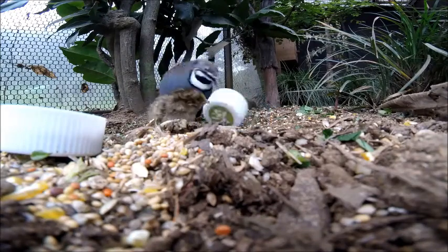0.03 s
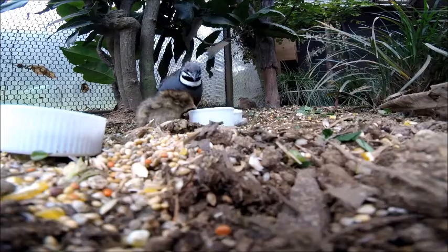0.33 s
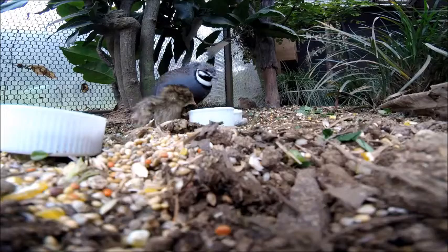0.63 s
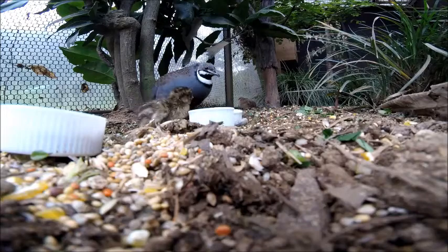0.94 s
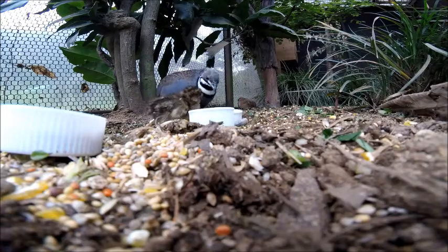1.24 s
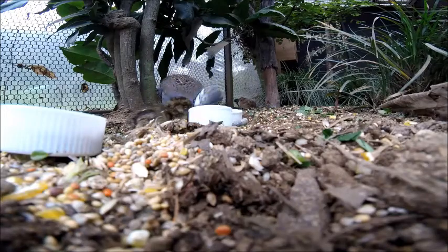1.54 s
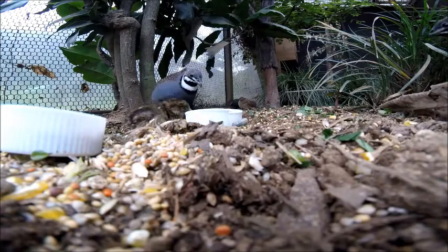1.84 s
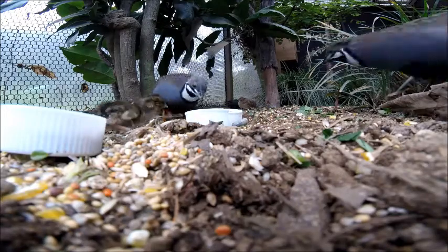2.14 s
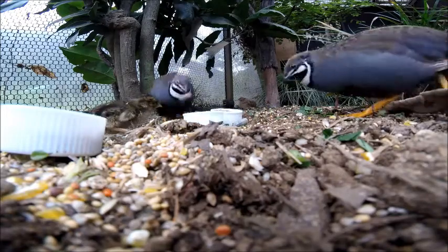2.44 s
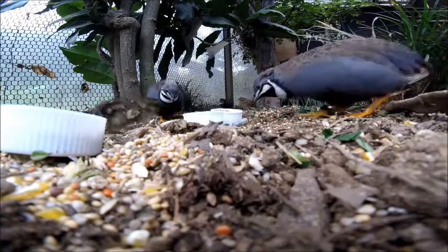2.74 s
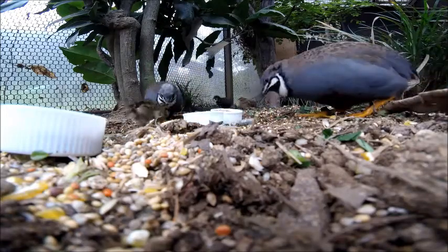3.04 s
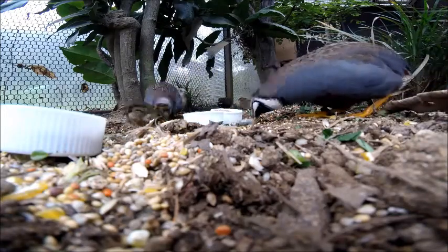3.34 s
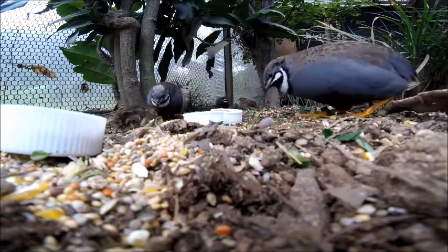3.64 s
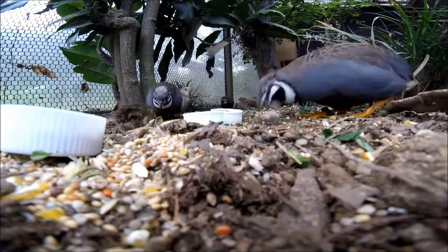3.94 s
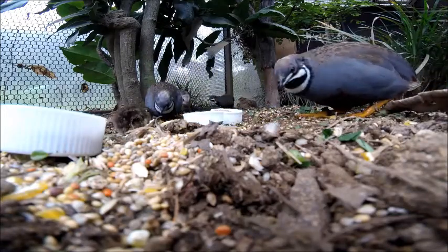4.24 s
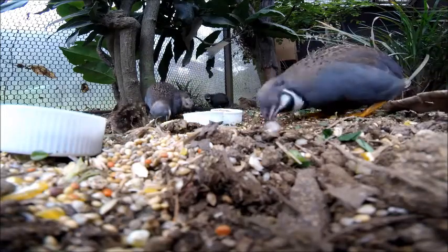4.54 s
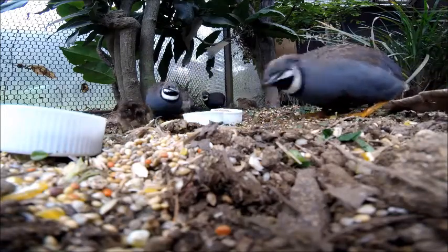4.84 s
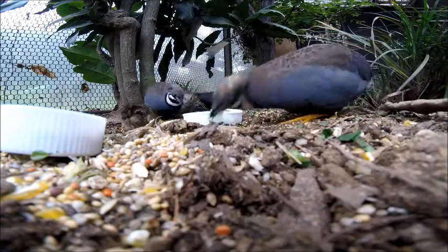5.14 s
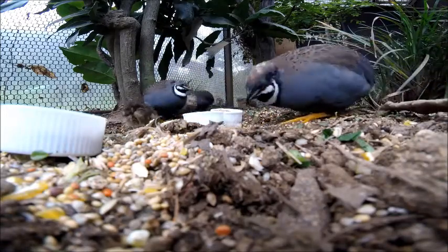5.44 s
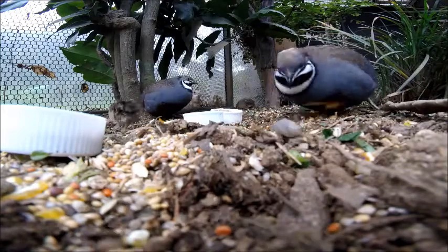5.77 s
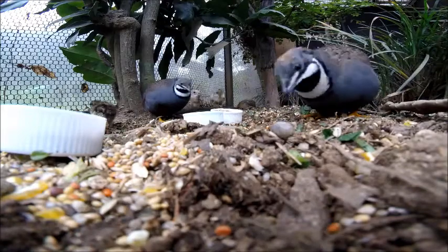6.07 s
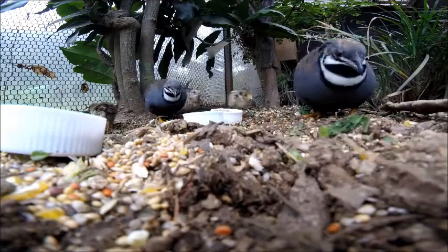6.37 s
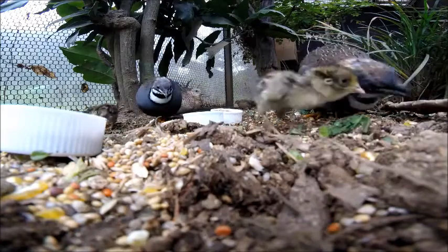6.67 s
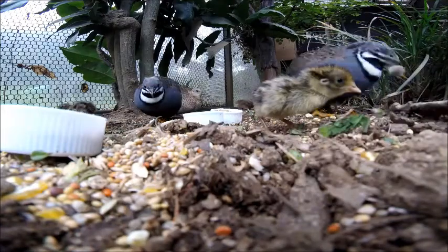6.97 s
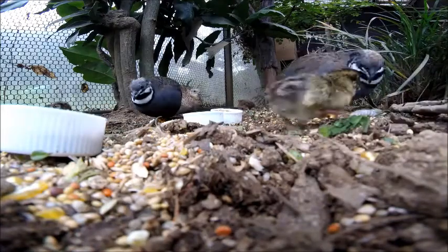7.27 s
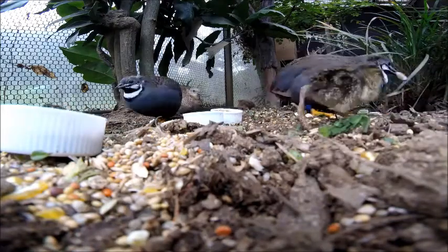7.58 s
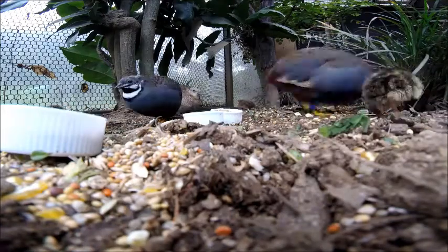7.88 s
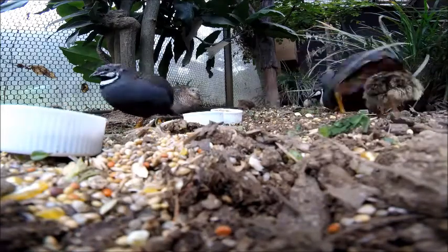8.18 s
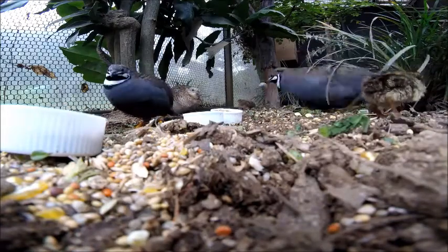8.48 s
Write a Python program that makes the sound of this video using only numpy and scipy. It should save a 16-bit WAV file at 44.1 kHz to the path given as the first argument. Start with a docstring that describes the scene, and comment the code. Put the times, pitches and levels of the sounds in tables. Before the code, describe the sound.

Small quail call irregularly, close by in an outdoor aviary. A few light pecks on seed open, then high peeps and a slightly rising nasal cry. After a quieter stretch come soft clucks, a hoarse cry and sharper pecks. Chicks whistle thinly throughout, louder in the second half, and a sharp falling squeal and a high rasp come near the end. A faint low rumble, machine hum and hiss lie underneath.

```python
"""Nasal cries, soft clucks and high peeps of small quail, close by at a food dish in an outdoor aviary.
Each call is one syrinx tone, clear or rasping, smeared by the nearby walls.
Chicks and other small birds whistle and chip around them, while beaks and feet tick on seed and bark.
Underneath lies a bed of low rumble, machine hum and steady hiss."""
import sys
import numpy as np
from scipy import signal
from scipy.fft import rfft, irfft, next_fast_len
from scipy.io import wavfile
from scipy.ndimage import uniform_filter1d, map_coordinates

SR = 44100
rng = np.random.default_rng(int(sys.argv[2]) if len(sys.argv) > 2 else 0)


def dump_mix(stems):
    """Bounce the given channels to the path in sys.argv[1] as a 16-bit WAV at rate SR."""
    frames = np.atleast_2d(stems).T  # one column per channel
    limited = np.clip(frames, -1, 1)  # hard clip at full scale
    pcm = np.round(limited * 32767).astype(np.int16)
    wavfile.write(sys.argv[1], SR, pcm)


N = 384111

# Short quail notes: nasal cries, shut-beak clucks and high peeps. Each row: crest time, attack and
# release in seconds, pitch in Hz, glide in octaves per second, crest level in dB,
# roughness (0 is clear, about 1 is a rasp), overtone boost in dB.
SHORT_CRIES = [ (3.81, .02, 0.037, 805, .2, -42, 0.35, 0), (3.932, 0.03, 0.025, 856, -0.069, -45.5, .4, -4),
               (8.53, .14, 0.084, 766, -0.033, -48, 0.97, -1), ]
CLUCKS = [ (.51, .012, .05, 972, 2, -57, .1, -10), (1.165, 0.016, 0.022, 1533, -8.5, -45, 1.1, 4),
          (1.67, 0.0083, .035, 958, 2, -51.5, .15, -13), (1.718, .035, .012, 1170, 7, -59, .02, 13),
          (1.745, 0.016, 0.0063, 1133, -11, -48.5, 0, -4), (5.346, 0.014, 0.023, 1125, 16, -41.5, 0.6, -7),
          (5.405, .012, 0.031, 1160, -16, -40, 0.54, -8.5), (5.458, 0.042, 0.02, 893, -1.5, -42.5, .25, -7),
          (6.635, 0.014, .08, 690, 1.1, -51.5, 0.06, -.5), (6.755, 0.089, .06, 681, 0, -49.5, 0.25, -6), ]
PEEPS = [ (.152, 0.015, 0.032, 2392, 0, -47, 0.4, -23), (.185, 0.036, 0.045, 3345, -4, -46, 0.8, -22),
         (.235, 0.042, 0.0067, 2433, -2, -38, 0.19, -28), (.828, 0.01, .018, 2420, -1, -44, .08, -16),
         (1.015, 0.0073, 0.031, 4130, -0.5, -45, 0.24, -15), (1.065, 0.029, 0.028, 4720, 4, -40, 0.34, -24),
         (1.13, 0.066, 0.035, 3610, 2.5, -36, 0.4, -7.5), (1.152, .006, .012, 5000, -3, -37.5, 0.43, -13),
         (1.17, 0.01, 0.016, 4810, -1, -36, 0.3, -21), (1.195, 0.0236, 0.037, 4000, -2.5, -46, .6, -9),
         (1.205, 0.021, 0.043, 3240, -3, -40, 0.3, -4.5), (2.362, .03, 0.056, 2080, 6.5, -49.5, 0.63, -10),
         (3.643, 0.024, 0.03, 1605, 1, -48, 0.23, -5), (3.715, 0.076, 0.041, 1990, 0.6, -49, 0.76, -5.5),
         (3.893, .006, 0.022, 2250, -1, -54, 0.4, -20), (3.925, 0.024, 0.097, 2860, -3.5, -50.5, 1, -18),
         (3.998, 0.034, .012, 2725, 0.5, -44, 0.2, -20), (4.017, 0.071, .04, 3570, 1.5, -55, 0.63, -25),
         (4.028, 0.011, .018, 2780, -1, -42.5, 0.6, -20), (4.325, .045, .03, 2250, 0, -57.5, 0.82, -15),
         (4.445, 0.061, 0.043, 2524, 1.5, -46, 0.33, -15),
         (4.735, 0.037, .025, 2360, -0.7, -50.5, 0.57, -3), (4.805, 0.036, 0.029, 2398, 0.7, -52, 0.54, 1),
         (5.513, 0.014, 0.038, 2413, 1.8, -39.5, 0.06, -10),
         (5.914, .006, 0.018, 4165, 1.5, -36.5, 0.08, -31),
         (5.938, 0.013, 0.0078, 4205, -1.5, -35.5, .04, -34),
         (5.975, 0.021, 0.012, 3530, 0, -32.5, 0.13, -13), (6.01, 0.018, 0.063, 3130, 4.5, -41.5, 0.23, -9),
         (6.035, 0.017, 0.054, 4800, -3, -44, .4, -10), (8.086, 0.023, .005, 5520, -3.5, -38.5, 0.1, -14),
         (8.097, 0.0067, 0.015, 2177, -1.5, -32, 0.7, 8.5), (8.6, .045, 0.025, 4540, -0.5, -45, 0.54, -11),
         (8.67, .014, 0.056, 3100, 2.5, -39.5, 0.3, -16), ]
NOTE_FADE_DB, NOTE_FADE_POWER, NOTE_END_ROUGH = 12.5, 1.44, 0.12
# Drawn quail calls, one to a table: three long nasal cries, a high rasp and a plunging squeal.
# Each row: time in seconds, pitch in Hz, level in dB, roughness.
RISING_CRY = [(.82, 825, -51, 0.44), (.845, 892, -37.5, 1.11), (.868, 868, -35.5, 0.11),
              (.903, 858, -38, 0.06), (.916, 902, -34, 0.24), (.945, 896, -38, 0.24), (1.01, 949, -36, 0.4),
              (1.06, 931, -36, 0.53), (1.11, 943, -38, 0.7), (1.135, 982, -55, 0.9)]
HOARSE_CRY = [(5.528, 908, -45, 0.65), (5.56, 940, -37.5, 0.045), (5.587, 906, -37, 0.063),
              (5.61, 888, -35.5, 0.11), (5.625, 836, -40.5, 0.26), (5.645, 895, -41, 1.23),
              (5.68, 893, -38, .45), (5.725, 892, -39.5, 0.68), (5.78, 913, -34, 0.25),
              (5.82, 862, -39, 0.16), (5.852, 842, -37.5, 0.081), (5.868, 832, -56, 0.44)]
LOW_CRY = [(6.42, 672, -52, 0.28), (6.48, 709, -47, 0.23), (6.5, 730, -41.5, 0.13),
           (6.56, 713, -42.5, 0.25), (6.595, 672, -45, 0.47), (6.625, 660, -51, .4)]
RASP = [(8.32, 2330, -53, 0.68), (8.358, 2140, -47, 0.75), (8.395, 2053, -35, 0.27),
        (8.43, 2020, -48.5, .6), (8.485, 2138, -38, 0.34), (8.51, 2133, -43.5, 0.49),
        (8.6, 2140, -46.5, 0.67), (8.635, 2030, -58, 0.85)]
SQUEAL = [(8.005, 5860, -46, .05), (8.018, 5860, -44, .1), (8.03, 4900, -32.5, 0.32),
          (8.04, 3930, -35, .62), (8.05, 3695, -25.5, .02), (8.055, 3690, -23.5, .05),
          (8.06, 3900, -57, .41)]
# The timbre of each voice. Each row: harmonic number, relative level in dB.
CRY_HARMONICS = [(1, -6.5), (2, -11), (3, -5.5), (4, 1), (5, -13), (6, -23.5), (7, -20), (8, -20), (9, -36),
                 (10, -37), (12, -40)]
CLUCK_HARMONICS = [(1, -4.5), (2, -3), (3, -13), (4, -21)]
PEEP_HARMONICS = [(1, 8.5), (2, 3), (3, -11.5), (4, -13.5)]
# Throat and beak favour harmonics as they glide past. Each row: frequency in Hz, gain in dB.
THROAT_EQ = [(1000, 2), (1800, -0.5), (2550, -3.5), (2850, 6), (3200, -2.5), (3600, 1.5), (4200, 0.5),
             (5500, -1), (6500, 6), (8000, -3)]

# Thin arched whistles. Each row: start and length in seconds, top pitch, rise and fall in Hz,
# level in dB.
THIN_WHISTLES = [ (.045, .067, 3400, 68, 190, -54.5), (0.206, .05, 2500, 0, 1100, -60),
                 (0.383, .055, 3450, 450, -1, -66), (1.3, .05, 3340, 190, 130, -60),
                 (1.44, .06, 3310, 110, 190, -61.5), (1.525, 0.27, 3680, 161, 112, -65),
                 (1.872, 0.066, 3500, 182, 310, -59.5), (1.945, 0.057, 2570, 0, 210, -63),
                 (2.003, 0.049, 3500, 230, 80, -59.5), (2.2, 0.3, 3600, 220, 67, -66.5),
                 (2.79, 0.24, 3790, 360, 120, -66.5), (2.88, .085, 3450, 148, 130, -70),
                 (3.035, 0.074, 3480, 188, 280, -61.5), (3.15, .06, 2540, 40, 130, -65),
                 (3.165, 0.077, 3700, 0, 370, -68), (3.47, 0.12, 3390, 394, 20, -69),
                 (3.77, .03, 3480, -6, 480, -64), (4.04, 0.1, 3540, -1, 300, -69),
                 (4.52, 0.12, 3550, 844, 5, -67), (4.84, 0.051, 3430, 0, 780, -63),
                 (6.35, .048, 3150, 0, 820, -62), (6.835, 0.04, 3530, -2, 900, -61),
                 (7.051, .045, 2480, 6, 600, -67), (7.11, 0.1, 3100, 120, 130, -68), ]
# Long whistles that sag on the climb. Each row: start and length in seconds, top pitch, rise and fall
# in Hz, sag delay in seconds, sag depth in Hz, crest level in dB.
LONG_WHISTLES = [ (4.89, 0.25, 3700, 348, 240, 0.12, 228, -65),
                 (5.225, 0.31, 3670, 1020, 480, 0.11, 210, -59.5),
                 (5.95, 0.3, 3625, 1020, 600, 0.15, 128, -52.5),
                 (6.636, 0.2, 3200, 615, 238, 0.078, 313, -43),
                 (7.326, .262, 3363, 928, 444, 0.12, 71, -47), (7.923, .258, 3220, 880, 380, .09, 131, -52),
                 (8.559, 0.29, 3706, 920, 405, 0.081, 129, -47), ]
CREST_SHARE, RISE_POWER, FALL_POWER = 0.59, 3.5, 1.64
SAG_WIDTH_S, CLIMB_FADE_DB, DROP_FADE_DB = 0.032, 3, 12
# Hooked calls. Each row: start and length in seconds, top pitch in Hz, base level in dB.
HOOKS = [(1.72, 0.09, 4860, -53.5), (2.453, 0.079, 4730, -58.5), (3.354, 0.09, 4950, -57)]
# A hook's dip, flick and fall. Each row: share of the length, ratio to top pitch, level offset in dB.
HOOK_SHAPE = [(0, .86, 3), (.22, .8, -1.5), (.48, 0.99, -6), (.72, .85, -2.5), (1, .69, 0)]
# Quick falling chips. Each row: start in seconds, crest level in dB.
CHIPS = [(.445, -55.5), (0.666, -56.5), (1.424, -54), (1.779, -58), (2.063, -56), (2.338, -53),
         (2.754, -60), (2.976, -58.5), (3.219, -60)]
CHIP_FROM_HZ, CHIP_TO_HZ, CHIP_S = 4750, 2055, 0.023
# A far bird slides down and back up. Each row: time in seconds, pitch in Hz, level in dB.
FAR_SLIDE = [(4.925, 2100, -66), (4.958, 1380, -61), (4.985, 1850, -70)]
FAR_CHICKS_PER_S, FAR_CHICK_MID_HZ, FAR_CHICK_MEAN_S = 2.1, 3180, 0.1185
FAR_CHICK_FLOOR_DB, FAR_CHICK_RANGE_DB = -97.5, 14

# Pecks and steps on seed and bark. Each row: start in seconds, tick level and thud level in dB,
# seconds to die away by 60 dB.
PECKS = [(.005, -41, -40.5, 0.018), (0.038, -49, -62, 0.031), (0.06, -43, -36.5, 0.032),
         (0.114, -51, -45.5, 0.024), (1.615, -48, -55, 0.04), (4.151, -50, -64, .015),
         (4.168, -45, -62, 0.0092), (4.342, -50, -50.5, 0.09), (5.826, -34, -48, 0.026),
         (5.842, -32, -45.5, 0.015), (6.787, -51, -59, 0.033), (7.524, -37, -52, 0.04),
         (7.56, -35.5, -39.5, 0.012)]
# Slaps off nearby walls and dishes. Each row: delay in seconds, gain in dB before a layer's wall trim.
WALL_ECHOES = [(.0047, -13), (0.011, -9), (0.02, -17.5), (.031, -25)]
# Noise colours for the pecks and the bed. Each row: frequency in Hz, relative level in dB.
TICK_COLOUR = [(500, -7), (1500, -1.5), (3500, 5), (6500, -0.5), (9000, -14), (14000, -39)]
THUD_COLOUR = [(80, -3), (300, -1.5), (800, 1), (1400, -18.5), (3000, -71)]
RUMBLE_COLOUR = [(12, -38), (20, -5.5), (63, -1), (91, -6), (151, -12), (240, -16.5), (276, -16.5),
                 (359, -20), (1110, -29), (1600, -30.5), (2500, -32.5), (3250, -82), (5500, -120)]
HISS_COLOUR = [(1500, -12), (2500, -1), (4000, -2), (5500, 2), (6100, 2), (6550, 7.5), (7200, 0),
               (9000, -3.5), (10300, -13), (11500, -8.5), (13000, -12.5), (14400, -34)]
RUMBLE_DB, HISS_DB = -50, -59.5
HUM_HZ, HUM_DB = 61.6, -55
HIGH_CUT_HZ = 14300


def quail():
    """The lead voices: nasal cries with a strong fourth harmonic, soft clucks, peeps and rasps."""
    # each call pairs a contour with its overtone boost in dB
    cries = [(RISING_CRY, 2), (HOARSE_CRY, 3), (LOW_CRY, -3)] + [note(*row) for row in SHORT_CRIES]
    clucks = [note(*row) for row in CLUCKS]
    peeps = [(RASP, 5.5), (SQUEAL, -23)] + [note(*row) for row in PEEPS]
    out = np.zeros(N)
    for call in cries:
        add(out, *syrinx(*call, CRY_HARMONICS, jitter=0.0775, rough_hz=413.3, shimmer_db=6.5))
    for call in clucks:
        add(out, *syrinx(*call, CLUCK_HARMONICS, jitter=0.123, rough_hz=408, shimmer_db=2.5))
    for call in peeps:
        add(out, *syrinx(*call, PEEP_HARMONICS, jitter=0.074, rough_hz=521, shimmer_db=5))
    return out


def syrinx(contour, overtone_db, harmonics, jitter, rough_hz, shimmer_db, edge_s=0.004, waver=0.0025):
    """A membrane follows a contour as roughness shakes pitch and harmonics; gives start and sound."""
    times, *curves = np.transpose(contour)
    times = np.sort(times)
    t = np.arange(times[0] - edge_s / 2, times[-1] + edge_s, 1 / SR)
    hz, db, rough = (np.interp(t, times, curve) for curve in curves)
    shake = jitter * rough * wander(len(t), rough_hz)
    hz = hz * (1 + shake + waver * wander(len(t), rate_hz=116))
    phase = 2 * np.pi * np.cumsum(hz) / SR
    tone = 0
    for k, harmonic_db in harmonics:
        # the strongest harmonics flutter most
        flutter_db = shimmer_db * rough * undb(harmonic_db / 2) * wander(len(t), rough_hz)
        throat_db = np.interp(k * hz, *np.transpose(THROAT_EQ))
        gain = undb(harmonic_db + overtone_db * (k > 1) + flutter_db + throat_db)
        tone = tone + gain * (k * hz < SR / 2) * np.sin(k * phase)
    gate = np.clip(np.minimum(t - t[0], t[-1] - t) / edge_s, 0, 1)
    return t[0], unit(tone) * undb(db) * gate


def note(crest_s, attack_s, release_s, hz, glide, db, rough, overtone_db):
    """Contour and overtone boost of a gliding note that swells and fades, roughest at its weak ends."""
    side = np.linspace(-1, 1, 9)  # the crest sits at 0
    t = side * np.where(side < 0, attack_s, release_s)
    fade = np.abs(side) ** NOTE_FADE_POWER
    pitch = hz * 2 ** (glide * t)
    contour = np.column_stack([crest_s + t, pitch, db - NOTE_FADE_DB * fade, rough + NOTE_END_ROUGH * fade])
    return contour, overtone_db


def whistlers():
    """Chicks and small birds sing nearly pure tones: arches, hooks, chips and a far slide."""
    arches = [arch(*row) for row in THIN_WHISTLES] + [sagging_arch(*row) for row in LONG_WHISTLES]
    hooks = [hook(*row) for row in HOOKS]
    chips = [chip(*row) for row in CHIPS]
    out = np.zeros(N)
    for contour in arches + hooks + chips + [FAR_SLIDE] + far_chicks():
        times, hz, db = np.transpose(contour)
        t = np.arange(times[0], times[-1], 1 / SR)
        # the muscles round the corners of each glide
        glide = uniform_filter1d(np.interp(t, times, hz), len(t) // len(times) + 1, mode="nearest")
        glide = glide * (1 + 0.007 * wander(len(t), rate_hz=68.7))
        phase = 2 * np.pi * np.cumsum(glide) / SR
        tone = np.sqrt(2) * (np.sin(phase) + undb(-22) * np.sin(2 * phase))
        envelope = undb(np.interp(t, times, db)) * signal.windows.tukey(len(t), 0.25)
        add(out, times[0], tone * envelope)
    return out


def arch(start_s, length_s, top_hz, rise_hz, fall_hz, db):
    """Contour of a thin whistle: a parabola in pitch at a steady level."""
    u = np.linspace(0, 1, 25)
    hz = top_hz - (np.sqrt(abs(rise_hz)) * (1 - u) - np.sqrt(abs(fall_hz)) * u) ** 2
    return np.column_stack([start_s + u * length_s, hz, np.full(len(u), db)])


def sagging_arch(start_s, length_s, top_hz, rise_hz, fall_hz, sag_s, sag_hz, db):
    """Contour of a long whistle: steep climb, brief sag, late crest and a fading fall."""
    u = np.linspace(0, 1, 49)
    rise = np.maximum(1 - u / CREST_SHARE, 0) ** RISE_POWER
    fall = np.maximum((u - CREST_SHARE) / (1 - CREST_SHARE), 0) ** FALL_POWER
    sag = np.exp(-((u * length_s - sag_s) / SAG_WIDTH_S) ** 2)
    hz = top_hz - rise_hz * rise - fall_hz * fall - sag_hz * sag
    level_db = db - CLIMB_FADE_DB * rise - DROP_FADE_DB * fall
    return np.column_stack([start_s + u * length_s, hz, level_db])


def hook(start_s, length_s, top_hz, db):
    """Contour of a call that dips, flicks up and falls."""
    return [(start_s + u * length_s, top_hz * ratio, db + trim_db) for u, ratio, trim_db in HOOK_SHAPE]


def chip(start_s, db):
    """Contour of a fast downward sweep, loudest halfway."""
    return [(start_s, CHIP_FROM_HZ, db - 2),
            (start_s + CHIP_S / 2, (CHIP_FROM_HZ + CHIP_TO_HZ) / 2, db),
            (start_s + CHIP_S, CHIP_TO_HZ, db - 4)]


def far_chicks():
    """Contours of very faint arches, scattered in time, length, pitch and level."""
    contours = []
    for when, length, pitch, level in rng.random((int(FAR_CHICKS_PER_S * N / SR), 4)):
        length_s = FAR_CHICK_MEAN_S * (0.5 + length)
        top_hz = FAR_CHICK_MID_HZ * 2 ** ((pitch - 0.5) / 2)
        db = FAR_CHICK_FLOOR_DB + FAR_CHICK_RANGE_DB * level
        contours.append(arch(when * N / SR, length_s, top_hz, rise_hz=257, fall_hz=150, db=db))
    return contours


def pecks():
    """Each contact is a bright crack of husks over a dull knock in the soil."""
    out = np.zeros(N)
    t = np.arange(SR // 10) / SR
    for start_s, tick_db, thud_db, t60 in PECKS:
        tick = undb(tick_db) * noise(len(t), TICK_COLOUR)
        thud = undb(thud_db) * noise(len(t), THUD_COLOUR)
        add(out, start_s, (tick + thud) * np.exp(-np.log(1000) * t / t60))
    return out


def aviary(x, tail_db, t60, wall_trim_db=0, build_s=0.0019):
    """The space: a few close reflections and a short diffuse tail."""
    t = np.arange(SR // 2) / SR
    envelope = np.exp(-np.log(1000) * t / t60) * np.minimum(t / build_s, 1) ** 2
    tail = rng.standard_normal(len(t)) * envelope
    response = undb(tail_db) * unit(tail) / np.sqrt(len(t))
    response[0] = 1  # the direct sound
    for delay_s, db in WALL_ECHOES:
        add(response, delay_s, undb([db + wall_trim_db]))
    return signal.fftconvolve(x, response)[:N]


def background():
    """The bed: low rumble, a wavering machine hum and a smooth high hiss."""
    hum_hz = HUM_HZ + 1.58 * wander(N, rate_hz=6)
    phase = 2 * np.pi * np.cumsum(hum_hz) / SR
    hum = unit(np.sin(phase) * undb(2.4 * wander(N, rate_hz=5)))
    rumble = noise(N, RUMBLE_COLOUR) * undb(0.46 * wander(N, rate_hz=3.4))
    hiss = noise(N, HISS_COLOUR)
    return undb(RUMBLE_DB) * rumble + undb(HUM_DB) * hum + undb(HISS_DB) * hiss


def noise(count, colour):
    """Coloured noise of rms 1, rolling off beyond the ends of its colour curve."""
    hz, db = np.transpose(colour)
    size = next_fast_len(count)
    f = np.maximum(np.fft.rfftfreq(size, 1 / SR), 1)
    gain = undb(np.interp(np.log(f), np.log(hz), db))
    roll_off = np.minimum(f / hz[0], 1) * np.minimum(hz[-1] / f, 1) ** 2
    spectrum = rfft(rng.standard_normal(size)) * gain * roll_off
    return unit(irfft(spectrum, size)[:count])


def wander(count, rate_hz):
    """Smooth random modulation of spread near 1 that changes rate_hz times a second."""
    place = np.arange(count) * rate_hz / SR
    return map_coordinates(rng.standard_normal(int(place[-1]) + 2), [place], order=2, mode="nearest")


def undb(db):
    """Decibels to gain."""
    return 10 ** (np.asarray(db) / 20)


def unit(x):
    """Scale to rms 1."""
    return x / np.sqrt(np.mean(x ** 2) + 1e-18)


def add(out, start_s, x):
    """Mix x into out from a given time."""
    i = max(int(start_s * SR), 0)
    out[i:i + len(x)] += x[:max(len(out) - i, 0)]


def scene():
    """The mono mix: quail, whistlers and pecks, each with its own reverb, over the bed."""
    calls = aviary(quail(), tail_db=-8, t60=0.25)
    whistles = aviary(whistlers(), tail_db=-18.5, t60=0.42, wall_trim_db=-11)
    taps = aviary(pecks(), tail_db=-10, t60=0.25, wall_trim_db=-3)
    return (calls + whistles + taps + background())[None]


def record(dry):
    """A steep high cut takes the very top off the mix."""
    return signal.sosfilt(signal.ellip(10, 0.2, 70, HIGH_CUT_HZ, fs=SR, output="sos"), dry)


dry = scene()
out = record(dry)
dump_mix(out)
```